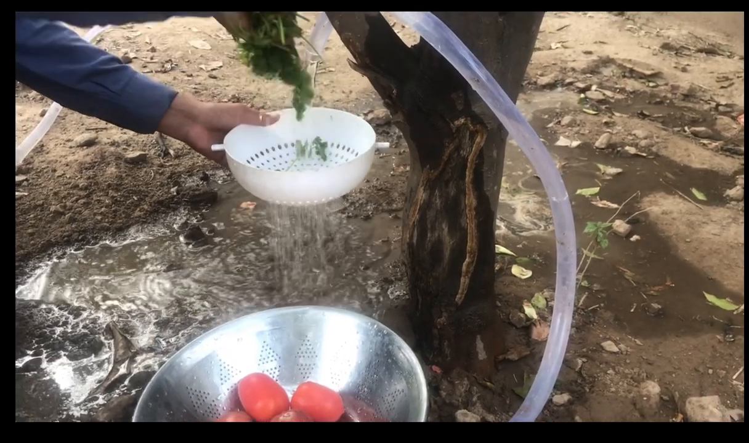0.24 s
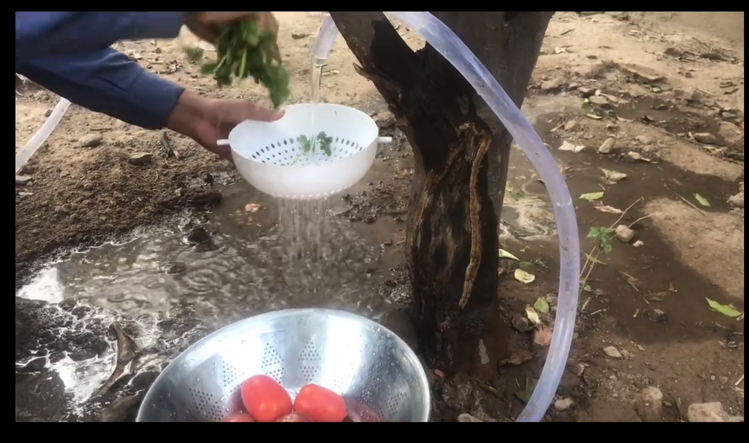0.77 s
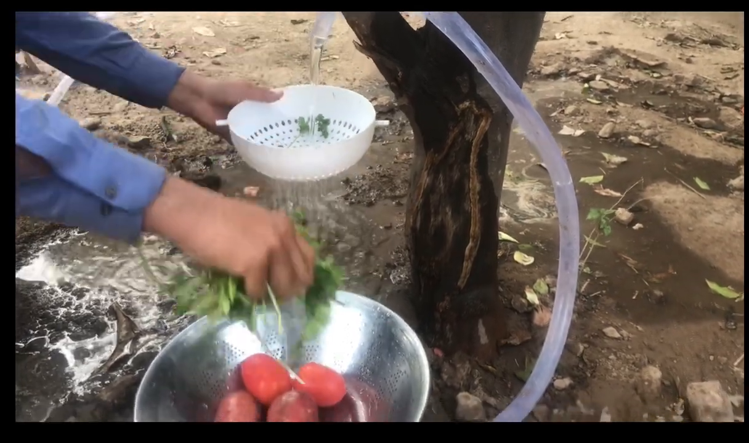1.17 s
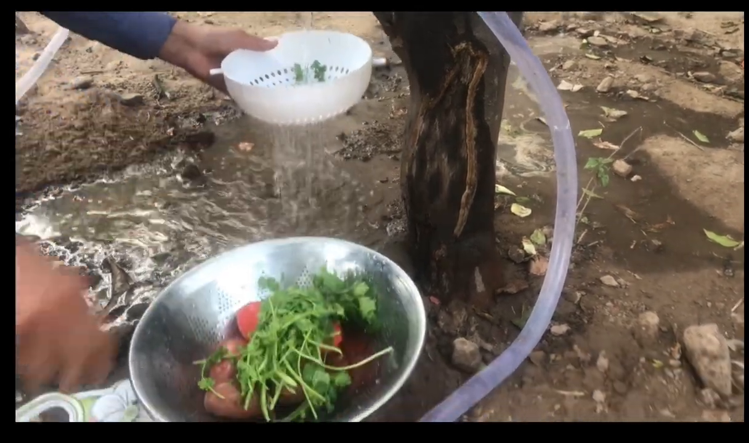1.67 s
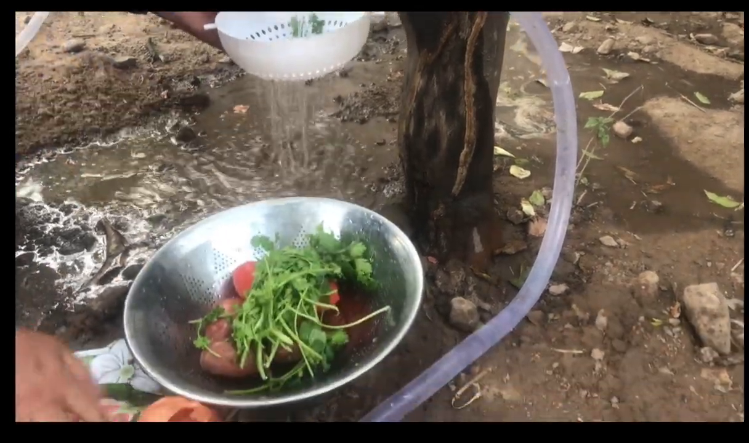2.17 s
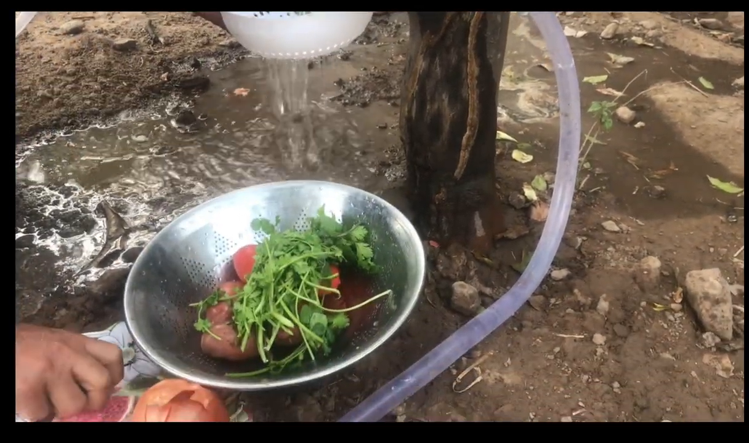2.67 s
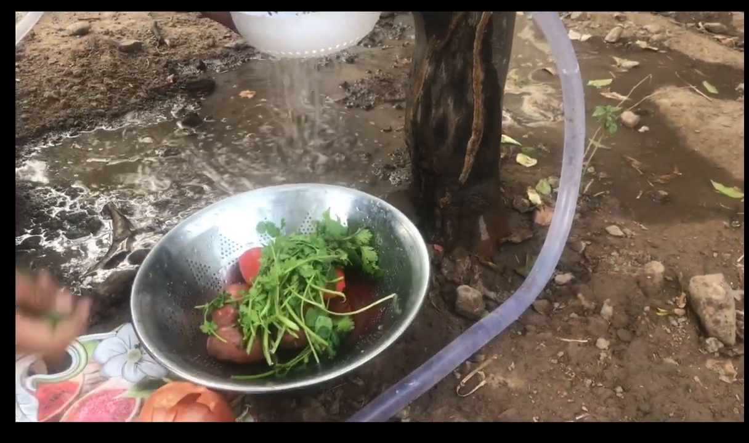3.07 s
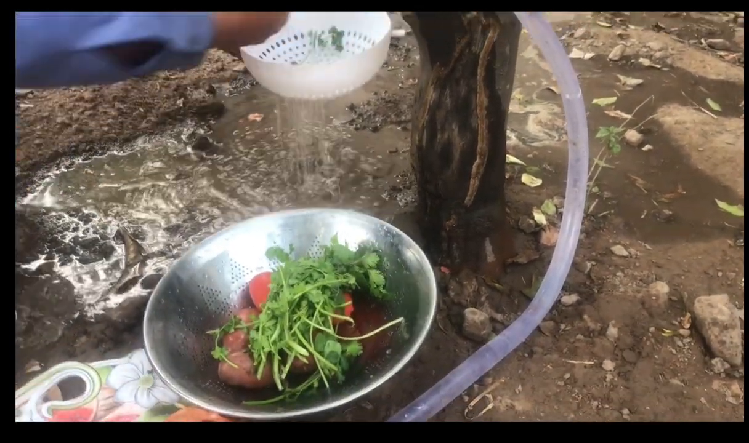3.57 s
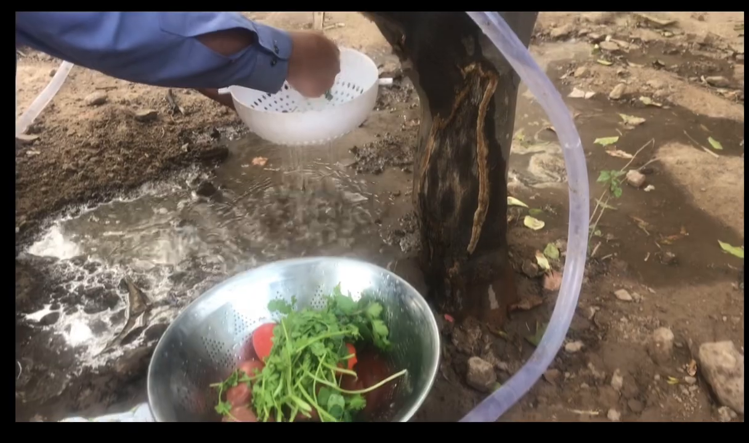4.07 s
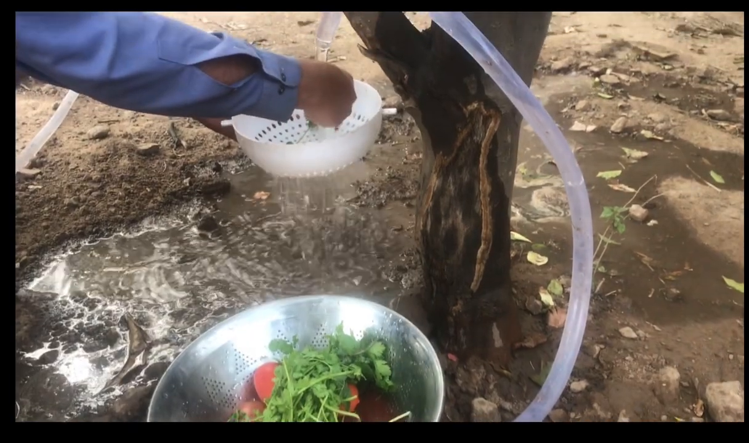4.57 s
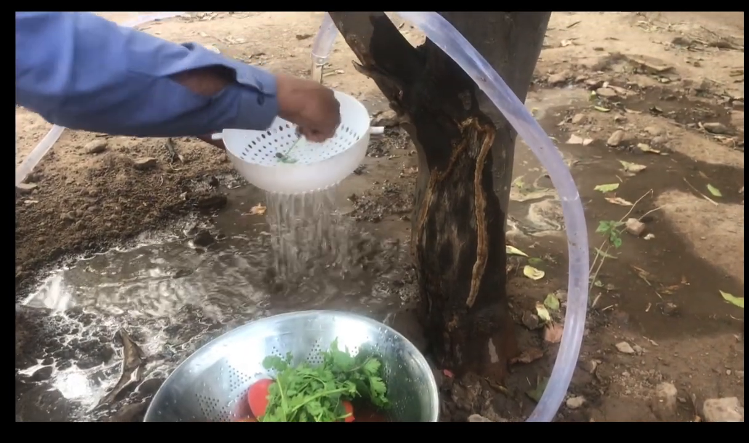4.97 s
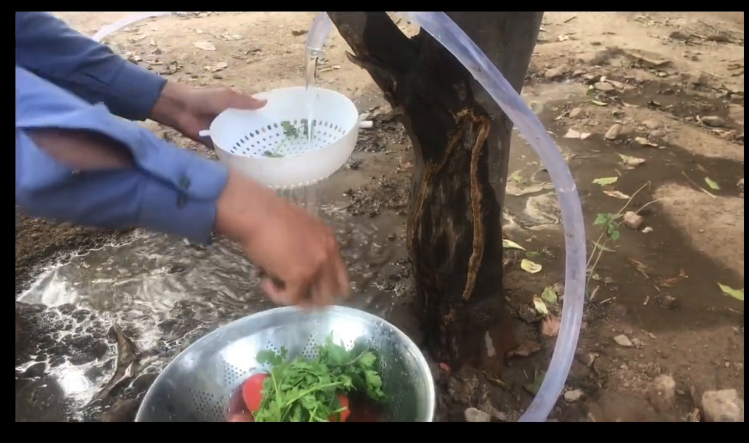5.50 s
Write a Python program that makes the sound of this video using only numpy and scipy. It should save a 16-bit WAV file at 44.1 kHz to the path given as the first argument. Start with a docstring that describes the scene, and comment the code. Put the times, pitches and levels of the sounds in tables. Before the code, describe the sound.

Close up and outdoors, hose water runs through a plastic colander and patters into a puddle for the whole stretch, nearly six seconds. Small bubbles plop, fine spray fizzes and stray drops slap on leaves and plastic, with brief stronger splashes around 0.7 and 1 second. At about 1.8 seconds a loaded steel bowl is set on soil with one dull, quickly damped knock. Short hollow plops and knocks come at 2.4 seconds, in a cluster from 3.6 to 3.8, and again near 5.1 and 5.5. The spray flares briefly around 4.7 and 5.1 seconds. A very faint, thin high whine lasts from about 3.5 to 4.8 seconds. Underneath, a distant engine rumbles and throbs unevenly, swelling a little just after 2 seconds, while a second motor hums softly and the microphone hisses faintly. There is almost no echo.

```python
"""Hose water runs through a plastic colander and patters onto wet ground, outdoors, close up.
Drops trap bubbles that plop in the puddle; spray fizzes and slaps on greens being rinsed.
A laden steel bowl is set down with a dull knock; short hollow plops and a faint high whine follow.
Underneath, a distant engine throbs unevenly, a second motor hums and the microphone hisses."""
import sys
import numpy as np
from scipy import signal
from scipy.fft import rfft, irfft
from scipy.io import wavfile

SR = 44100
rng = np.random.default_rng(int(sys.argv[2]) if len(sys.argv) > 2 else 0)


def transcribe(signal):
    """Save signal, clipped to [-1, 1], as a 16-bit WAV file at the path in sys.argv[1]."""
    frames = np.atleast_2d(signal).T
    limited = np.clip(frames, -1, 1)
    pcm = np.round(limited * 32767).astype(np.int16)
    wavfile.write(sys.argv[1], SR, pcm)


N = 253134
TIME = np.arange(N) / SR

# puddle patter spectrum: freq_hz, density_db
PATTER_SPECTRUM = [(250, -2.5), (430, -4), (600, 0.5), (950, 1), (1120, -1.5), (1350, 0), (1600, -5),
                   (1850, -6), (2100, -12.5), (2480, -12.5), (2900, -32), (4500, -51)]
# fine spray spectrum: freq_hz, density_db
SPRAY_SPECTRUM = [(1200, -42), (2300, 4), (3200, 5), (4200, 3), (4850, -1), (5300, 0), (6300, -2.5),
                  (7300, -14), (9500, -35), (10400, -55), (13000, -17), (16000, -33)]
# hand or greens cut the stream: centre_s, half_width_s, patter_gain_db, spray_gain_db
SPLASHES = [(0.747, 0.042, 2, 5.5), (1.027, 0.027, 2, 3), (3.257, 0.064, 1.5, 0.5), (4.002, 0.11, 1, 0),
            (4.745, 0.019, 0.5, 6.5), (5.145, 0.047, 3, 3)]
# engine speed: time_s, firings_per_s
ENGINE_SPEED = [(0, 11.72), (1.5, 11.76), (2.4, 11.72), (3.2, 11.62), (4.2, 11.66), (5, 11.7), (5.74, 11.8)]
# engine lines: firing_multiple, base_level_db
ENGINE_ORDERS = [(2, -70), (3.5, -50), (4, -51.5), (6, -39), (7, -36), (8, -51.5), (8.5, -46), (9, -51.5),
                 (10, -55.5), (13, -46), (14, -57), (17, -73), (18, -59)]
# 76 Hz hum that swells in and beats against the engine: time_s, base_level_db
BEATING_HUM = [(0, -57), (1.9, -58), (2.3, -39.5), (3.9, -39), (4.6, -43.5), (5.74, -53)]
# envelope of the engine lines: time_s, gain_db
ENGINE_GAIN = [(0, -0.5), (1.1, -1.5), (1.87, 1), (1.96, -24), (2.04, -1), (3.2, -2.5), (3.9, -1),
               (5.74, -2.5)]
# brief engine swells and dips: centre_s, gain_db
THROBS = [(0.35, -3), (0.5, 2.5), (0.85, -3), (0.94, 5), (1.02, 4), (1.2, 5), (1.33, -3), (2.04, 0),
          (2.21, -3.5), (2.29, 1), (2.38, 1.5), (3.45, -1.5), (3.91, -11), (4.02, 4), (4.18, -6), (4.27, 3),
          (4.37, 5), (4.8, 3), (4.88, -14), (5.2, 2)]
# engine noise spectrum: freq_hz, density_db
RUMBLE_SPECTRUM = [(15, -24), (28, -17), (38, -1), (55, 3.5), (66, 2), (92, 5), (125, 3), (160, 0.5),
                   (185, -5), (225, -8.5), (310, -13.5), (450, -23.5), (900, -44.5)]
# second motor lines: shaft_multiple, full_level_db
MOTOR_ORDERS = [(4, -55), (5, -49.5)]
# microphone hiss spectrum: freq_hz, density_db
HISS_SPECTRUM = [(500, -4), (4000, -5), (7500, -7), (10000, -7), (11000, -6), (12300, -3), (12900, 0),
                 (14400, .6), (15100, -6), (15700, -9)]
# faint steady hums: start_s, end_s, pitch_hz, level_db
HUMS = [(0, 0.49, 180.3, -49), (0, 0.87, 144.2, -44), (0, 0.76, 157.8, -45)]
# air pockets under the stream: start_s, end_s, start_hz, end_hz, width_hz, level_db
GURGLES = [(0.055, 0.613, 979, 945, 90, -59.5), (0.757, 1.152, 936, 909, 100, -62.5),
           (3.197, 3.396, 820, 752, 130, -54.5), (4.596, 5.11, 954, 937, 69.6, -61.5),
           (5.127, 5.233, 603, 586, 170, -53.5)]
# flung water on leaves and plastic: start_s, peak_db, centre_hz
SLAPS = [(0.096, -49, 13600), (0.2232, -48, 6480), (0.2848, -44, 2700), (0.4135, -48, 8950),
         (0.4533, -42, 3200), (0.7235, -44, 2440), (0.7315, -48, 12500), (0.887, -50, 3600),
         (1.030, -47, 12600), (1.037, -48, 2700), (1.073, -49, 9600), (1.245, -50, 6000),
         (1.268, -52, 9800), (1.491, -48, 9200), (1.504, -46.5, 6160), (1.551, -39, 12500),
         (1.674, -49, 12600), (1.703, -50, 6300), (2.1657, -48, 6000), (2.5257, -49, 3500),
         (2.958, -49, 5400), (3.895, -48, 5670), (3.9453, -43.5, 3000), (4.0701, -47, 4300),
         (4.1126, -53, 9400), (4.4815, -50, 9000), (4.564, -50, 9700), (4.745, -49, 4800),
         (4.763, -52, 5200), (4.900, -52, 8900), (4.918, -52, 5700), (5.1025, -45, 3200),
         (5.1485, -43, 2200), (5.7264, -45, 4870)]
# heaviest drops: start_s, peak_db, pitch_hz
HEAVY_DROPS = [(0.2073, -42.5, 4280), (0.2852, -46, 3500), (0.3724, -45, 2500), (0.4378, -45, 930),
               (0.5735, -37, 1000), (0.591, -42, 3320), (0.669, -41, 800), (0.724, -47, 2920),
               (1.0163, -32, 1370), (1.043, -44, 990), (1.161, -41, 890), (1.163, -40, 1330),
               (1.263, -39, 1430), (1.2648, -41.5, 3200), (1.3445, -38, 3500), (2.1182, -43, 2460),
               (2.524, -40, 1420), (2.68, -40.5, 1370), (2.854, -43, 1100), (3.209, -41.5, 2220),
               (3.496, -39.5, 740), (3.564, -42, 1290), (4.196, -39, 840), (4.3062, -41, 724),
               (4.877, -39, 950), (5.464, -46, 1300)]
# bowl meets ground, duller where soil cushions it: start_s, clank_gain_db, cutoff_hz, thud_gain_db
BOWL_CONTACTS = [(1.7908, -6, 1600, -29), (1.8078, 0.5, 3600, -1), (1.8125, -3.5, 1700, -22),
                 (1.8172, -3, 2000, -18), (1.8209, -4.5, 3800, -22), (1.8248, -7.5, 3000, -21),
                 (1.868, -11, 2600, -25)]
# steel damped by vegetables and soil: freq_hz, gain_db, t60_s
STEEL_MODES = [(554, -2, 0.12), (650, -12, 0.13), (840, -1, 0.071), (960, -17, 0.066), (1090, -15, 0.045),
               (1205, 3.5, 0.064), (1320, 11, 0.031), (1430, -1, 0.088), (1465, -0.5, 0.13),
               (1620, -14.5, 0.12), (1750, -11, 0.17), (2200, -17, 0.031), (2530, 0, 0.026),
               (2680, -11, 0.018), (3280, -10, 0.064), (3420, -21, 0.027), (3870, -18, 0.02)]
# heavily damped soil: freq_hz, gain_db, t60_s
SOIL_MODES = [(124, -10, 0.048), (176, -12.5, 0.029), (267.5, -17.5, 0.03)]
# grit under the bowl's foot: freq_hz, density_db
GRIT_SPECTRUM = [(250, -30), (500, -4), (1800, 0), (2900, 6), (3300, -5), (4100, 7), (4700, -16),
                 (8000, -3)]
# load jostling in the bowl: freq_hz, density_db
RATTLE_SPECTRUM = [(170, -12), (280, 3), (390, -21), (600, 7), (950, -4.5), (1300, -1), (1650, -0.5),
                   (2000, -20), (2550, -0.5), (2950, -17), (3500, -13), (4800, -28), (7000, -40)]
# short hollow plops and knocks: start_s, peak_db, pitch_hz, ring_cycles, rise_per_ring_time
HOLLOW_PLOPS = [(2.4016, -30.5, 1040, 0.65, .11), (3.5915, -38, 700, 1.8, -0.0098),
                (3.6095, -33, 680, 2.4, 0.018), (3.626, -45, 790, 1.5, 0.079),
                (3.6525, -33, 880, 2.5, 0.16), (3.7904, -29, 880, 1.7, 0.073),
                (3.7939, -36, 796, 1.4, 0.033), (5.132, -30, 804, 0.73, 0.13), (5.149, -36, 800, 1.1, .11),
                (5.204, -39, 700, 1, .11), (5.547, -40, 604, 1.8, 0.016)]
# microphone peaks and dips: centre_hz, width_hz, gain_db
MICROPHONE_BANDS = [(5030, 180, -2.5), (7220, 70, 3), (7600, 350, -1.5), (10380, 260, -5), (10820, 80, 3.5),
                    (12630, 80, 3.5)]


def gain_of(db):
    """Decibels to amplitude."""
    return 10 ** (np.asarray(db) / 20)


def unit_rms(x):
    """Scale to rms 1."""
    return x / np.sqrt(np.mean(x ** 2) + 1e-20)


def curve(rows):
    """A (time_s, value) table at every sample."""
    return np.interp(TIME, *np.transpose(rows))


def coloured(x, spectrum):
    """Filter x by a spectrum; rms 1."""
    hz, db = np.transpose(spectrum)
    shape_db = np.interp(np.log(np.fft.rfftfreq(N, 1 / SR) + 1), np.log(hz), db)
    return unit_rms(irfft(rfft(x) * gain_of(shape_db), N))


def noise(spectrum):
    """Coloured noise; rms 1."""
    return coloured(rng.standard_normal(N), spectrum)


def wander(rate_hz):
    """Random drift up to about rate_hz; rms 1."""
    hz = np.fft.rfftfreq(N, 1 / SR)
    return unit_rms(irfft(rfft(rng.standard_normal(N)) / (1 + (hz / rate_hz) ** 4), N))


def add(mix, start_s, sound):
    """Mix a sound in at start_s."""
    part = mix[max(round(start_s * SR), 0):][:len(sound)]
    part += sound[:len(part)]


def wavering_tone(hz, level_db, waver_db, waver_rad):
    """Sine drifting in level and phase."""
    phase = 2 * np.pi * (hz * TIME + rng.random()) + waver_rad * wander(2.2)
    return np.sqrt(2) * gain_of(level_db + waver_db * wander(3.5)) * np.cos(phase)


def struck(modes, t):
    """Decaying modes of a struck body, alternating in sign."""
    return sum(gain_of(db - 60 * t / t60_s) * np.sin(2 * np.pi * hz * t) * (-1) ** k
               for k, (hz, db, t60_s) in enumerate(modes))


def bubble(hz, cycles, rise=0.043):
    """A trapped bubble swells, rings and climbs in pitch as it nears the surface."""
    age = np.arange(int(8 * cycles / hz * SR) + 2) / SR * hz / cycles  # in ring times
    envelope = (1 - np.exp(-(age / .5) ** 2)) * np.exp(-age ** 1.27)
    phase = 2 * np.pi * cycles * (age + rise * (age ** 2 / 2 - age))
    return envelope / envelope.max() * np.sin(phase)


def shower(low_hz, high_hz, per_s, spread_db, cycles, pitches=48, max_spreads=4):
    """Randomly timed drops, most weak, a few strong; rms 1."""
    out = np.zeros(N)
    for hz in np.geomspace(low_hz, high_hz, pitches):
        lands = rng.random(N) < per_s / pitches / SR
        strength = np.minimum(-np.log(rng.random(N)[lands]), max_spreads)
        impacts = np.zeros(N)
        impacts[lands] = gain_of(spread_db * strength)
        stretch = rng.uniform(0.82, 1.75)
        out += signal.oaconvolve(impacts, bubble(hz, cycles * stretch) * hz / np.sqrt(stretch))[:N]
    return unit_rms(out)


def splash_db(column):
    """Boost of one water layer while the stream is cut."""
    return sum(row[column] * np.exp(-((TIME - row[0]) / row[1]) ** 2) for row in SPLASHES)


def puddle(start_db=-51.5, fall_db_per_s=0.2152):
    """Strands from the colander plop in the puddle, over a wash of merged splashes."""
    drops = shower(497.0, 2720, per_s=1200, spread_db=2.5, cycles=2.8)
    patter = coloured(drops, PATTER_SPECTRUM) + gain_of(0.5) * noise(PATTER_SPECTRUM)
    flicker_db = 0.68 * wander(42) + 0.19 * wander(88)
    return unit_rms(patter) * gain_of(start_db - fall_db_per_s * TIME + splash_db(2) + flicker_db)


def puddle_bubbles(count=260, low_hz=750, high_hz=1700, max_peak_db=-48):
    """Separate larger bubbles ring on, longer than the drops."""
    out = np.zeros(N)
    for when, pitch, weakness, length in rng.random((count, 4)):
        plop = bubble(low_hz * (high_hz / low_hz) ** pitch, cycles=4 + 3 * length)
        add(out, when * N / SR, gain_of(max_peak_db - 8 * weakness) * plop)
    return out


def spray(start_db=-63.5, fall_db_per_s=0.34):
    """Fine droplets burst into tiny bubbles on leaves, plastic and mud, in flurries."""
    drops = shower(2000, 14500, per_s=1700, spread_db=2.9, cycles=2.4, max_spreads=3.4)
    fizz = coloured(drops, SPRAY_SPECTRUM) + gain_of(-3) * noise(SPRAY_SPECTRUM)
    flurries_db = 1.7 * wander(25) + 1.1 * wander(150)
    return unit_rms(fizz) * gain_of(start_db - fall_db_per_s * TIME + splash_db(3) + flurries_db)


def sparkle(level_db=-71.5):
    """The tiniest droplets tick and ping in small surges."""
    ticks = shower(7000, 14000, per_s=300, spread_db=3, cycles=2.2, pitches=12)
    pings = shower(11800, 14300, per_s=140, spread_db=3.3, cycles=12, pitches=12)
    surges_db = 2.2 * wander(25) + 1.5 * wander(6)
    return gain_of(level_db) * unit_rms((ticks + pings) * gain_of(surges_db))


def engine_boom_db(line_hz, centre_hz=83.5, width_hz=8.6, peak_db=9.5):
    """One boom: a boost of the engine lines near centre_hz."""
    start_s, end_s, rise_s, fall_s = 2.0, 2.46, 0.03, 0.078
    attack = np.clip((TIME - start_s) / rise_s, 0, 1)
    release = np.exp(-np.maximum(TIME - end_s, 0) / fall_s)
    return peak_db * np.exp(-((line_hz - centre_hz) / width_hz) ** 2) * attack * release


def engine(rumble_db=-37, rumble_fall_db_per_s=0.55, hum_order=6.5):
    """Slow distant engine: firing-rate orders throb over a rumble; a hum beats against them."""
    strong_firing_s, throb_half_width_s = 0.078, 0.026
    firing_hz = curve(ENGINE_SPEED)
    firings = np.cumsum(firing_hz) / SR - firing_hz[0] * strong_firing_s
    throb_db = sum(db * np.exp(-((TIME - s) / throb_half_width_s) ** 2) for s, db in THROBS)
    envelope_db = curve(ENGINE_GAIN) + throb_db
    out = noise(RUMBLE_SPECTRUM) * gain_of(rumble_db - rumble_fall_db_per_s * TIME + 0.18 * throb_db)
    for order, base_db in ENGINE_ORDERS + [(hum_order, curve(BEATING_HUM))]:
        # orders near the exhaust resonance stay in step and swell together at each firing
        scatter_cycles = 0.04 if 6 <= order <= 8 else 0.3
        phase = 2 * np.pi * (order * firings + scatter_cycles * wander(2.02))
        level_db = base_db + envelope_db + engine_boom_db(order * firing_hz) + 1.36 * wander(2.5)
        out += np.sqrt(2) * gain_of(level_db) * np.cos(phase)
    return out


def motor(shaft_hz=37.85, rise_db=8, rise_s=3.3):
    """A second distant motor hums at shaft harmonics, growing louder, then holding."""
    fade_db = rise_db * np.minimum(TIME / rise_s - 1, 0)
    return sum(wavering_tone(order * shaft_hz, db + fade_db, waver_db=2, waver_rad=.4)
               for order, db in MOTOR_ORDERS)


def hiss_and_hums(hiss_db=-64.0):
    """Bright, restless microphone hiss; faint hums in the first second."""
    out = gain_of(hiss_db + 0.48 * wander(40)) * noise(HISS_SPECTRUM)
    for start_s, end_s, hz, db in HUMS:
        t = np.arange(int((end_s - start_s) * SR)) / SR
        hum = signal.windows.tukey(len(t), .15) * np.sin(2 * np.pi * hz * t)
        add(out, start_s, np.sqrt(2) * gain_of(db) * hum)
    return out


def gurgles():
    """The stream stirs air pockets into wavering hollow notes."""
    out = np.zeros(N)
    for start_s, end_s, start_hz, end_hz, width_hz, db in GURGLES:
        n = int((end_s - start_s) * SR)
        stir = (wander(width_hz / 2) + 1j * wander(width_hz / 2))[:n]
        phase = 2 * np.pi * np.cumsum(np.linspace(start_hz, end_hz, n)) / SR
        note = (stir * np.exp(1j * phase)).real
        add(out, start_s, gain_of(db) * unit_rms(note * signal.windows.tukey(n, .5)))
    return out


def slaps(decay_s=0.002, width_hz=2000):
    """Flung drops burst flat: short crackles, no ring."""
    t = np.arange(SR // 60) / SR
    out = np.zeros(N)
    for start_s, peak_db, centre_hz in SLAPS:
        edges_hz = centre_hz + np.array([-.5, .5]) * width_hz
        burst = rng.standard_normal(len(t)) * np.exp(-t / decay_s)
        slap = signal.sosfilt(signal.butter(2, edges_hz, "band", fs=SR, output="sos"), burst)
        add(out, start_s, gain_of(peak_db) * slap / abs(slap).max())
    return out


def heavy_drops(droplets_each=3, cycles_at_1khz=2.07):
    """Heavy drops plop; each throws droplets that land just after."""
    out = np.zeros(N)
    for start_s, peak_db, hz in HEAVY_DROPS:
        cycles = cycles_at_1khz * (hz / 1000) ** 0.13  # small bubbles ring for more cycles
        add(out, start_s, gain_of(peak_db) * bubble(hz, cycles))
        for flight, weakness, pitch in rng.random((droplets_each, 3)):
            droplet = bubble(min(hz * (.8 + .7 * pitch), 14000), cycles=3)
            droplet_db = min(peak_db - 8, -46) - 6 * weakness
            add(out, start_s + .002 + .016 * flight, gain_of(droplet_db) * droplet)
    return out


def bowl(grit_t60_s=0.013, rattle_t60_s=0.07):
    """The bowl lands in quick contacts: grit cracks, steel clanks, the load rattles, soil thuds."""
    t = np.arange(SR // 3) / SR
    thud = struck(SOIL_MODES, t) * (1 - np.exp(-t / 0.0036))  # soil yields before it pushes back
    out = np.zeros(N)
    for start_s, clank_gain_db, cutoff_hz, thud_gain_db in BOWL_CONTACTS:
        grit = noise(GRIT_SPECTRUM)[:len(t)] * gain_of(-2.5 - 60 * t / grit_t60_s)
        rattle = noise(RATTLE_SPECTRUM)[:len(t)] * gain_of(1 - 60 * t / rattle_t60_s)
        modes = np.array(STEEL_MODES)
        modes[:, 0] *= rng.uniform(.96, 1.04, len(modes))  # the shifting load detunes the steel
        steel = gain_of(-4) * struck(modes, t)
        cushion = signal.butter(2, cutoff_hz, fs=SR, output="sos")
        clank = signal.sosfilt(cushion, steel + grit + rattle)
        add(out, start_s, gain_of(clank_gain_db - 35.5) * clank + gain_of(thud_gain_db + 1.5) * thud)
    return out


def hollow_plops():
    """Short hollow plops and knocks, some rising in pitch."""
    out = np.zeros(N)
    for start_s, peak_db, hz, cycles, rise in HOLLOW_PLOPS:
        add(out, start_s, gain_of(peak_db) * bubble(hz, cycles, rise))
    return out


def whine(start_s=3.48, end_s=4.78, pitch_hz=8034, level_db=-82):
    """A faint, thin high whine near 8 kHz."""
    n = int((end_s - start_s) * SR)
    tone = wavering_tone(pitch_hz, level_db, waver_db=.7, waver_rad=3)[:n]
    out = np.zeros(N)
    add(out, start_s, signal.windows.tukey(n, .1) * tone)
    return out


def yard_echo(x, wet_db=-13, t60_s=.13, delay_s=.002):
    """x plus a short, weak echo scattered by ground, trunk and bowl."""
    t = np.arange(SR // 3) / SR
    reflections = rng.standard_normal(len(t)) * (rng.random(len(t)) < .05)
    tail = reflections * gain_of(-60 * t / t60_s) * (t > delay_s)
    return x + gain_of(wet_db) * signal.oaconvolve(x, tail / np.linalg.norm(tail))[:N]


def scene():
    """Water and bowl in the yard, over distant machines; mono."""
    water = puddle() + puddle_bubbles() + spray() + sparkle() + slaps()
    near = water + whine() + heavy_drops() + hollow_plops() + gurgles() + bowl()
    return (yard_echo(near) + engine() + motor() + hiss_and_hums())[None]


def record(dry):
    """Microphone colour, then a steep low-pass."""
    cutoff_hz = 15720
    hz = np.fft.rfftfreq(N, 1 / SR)
    colour_db = sum(db * np.exp(-((hz - centre_hz) / width_hz) ** 2)
                    for centre_hz, width_hz, db in MICROPHONE_BANDS)
    heard = irfft(rfft(dry) * gain_of(colour_db), N)
    lowpass = signal.firwin(511, cutoff_hz, window=("kaiser", 9), fs=SR)
    return signal.oaconvolve(heard, lowpass[None], "same")


dry = scene()
out = record(dry)
transcribe(out)
```